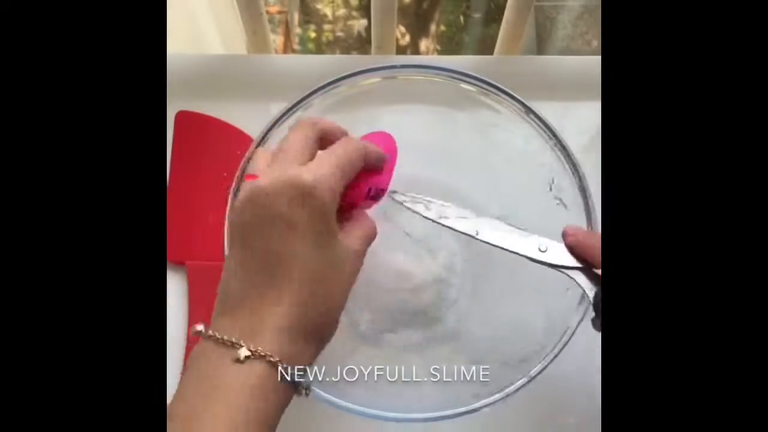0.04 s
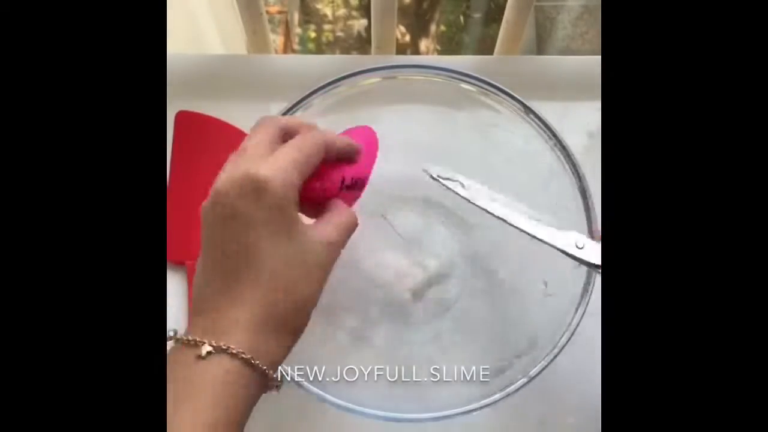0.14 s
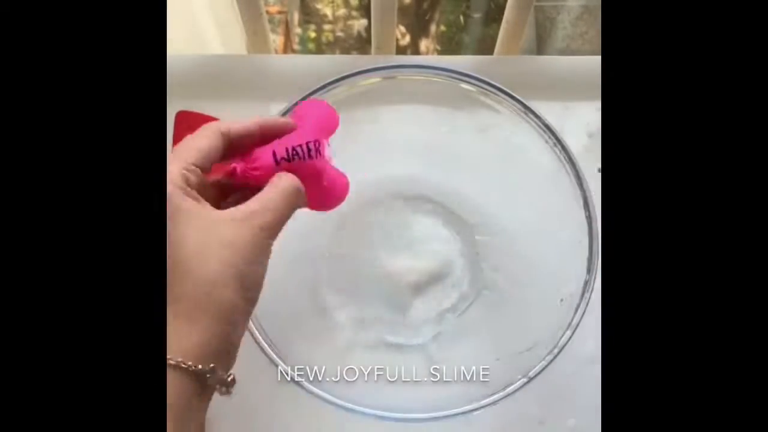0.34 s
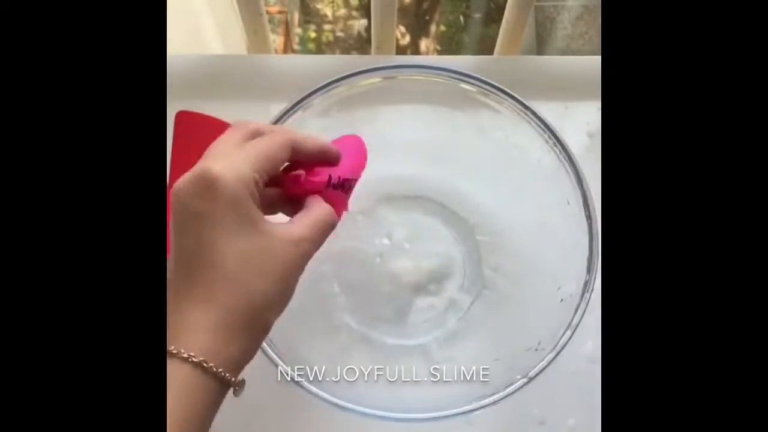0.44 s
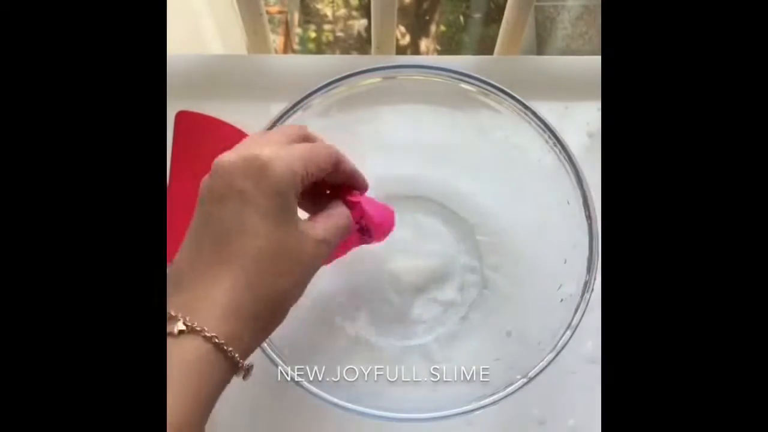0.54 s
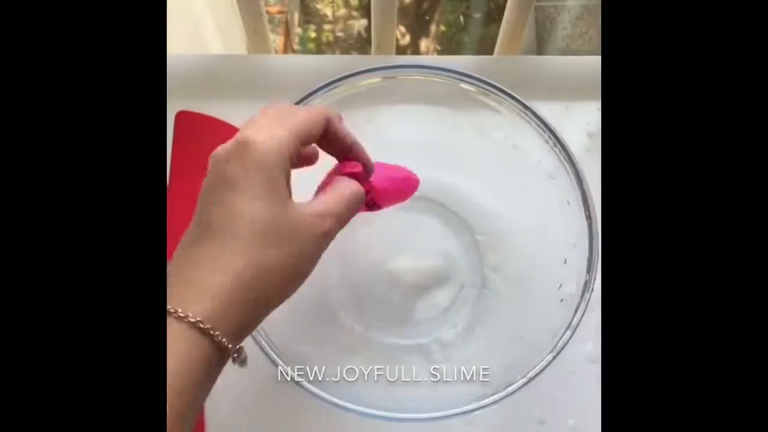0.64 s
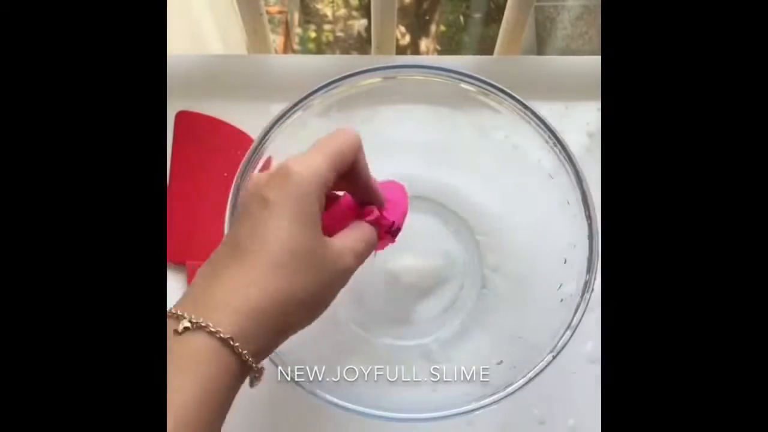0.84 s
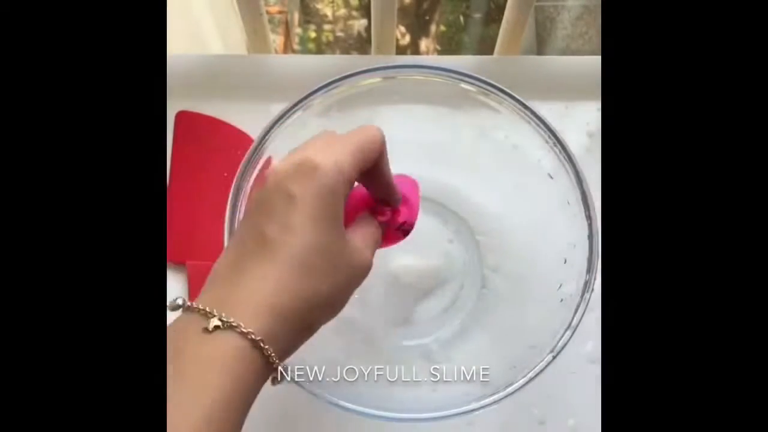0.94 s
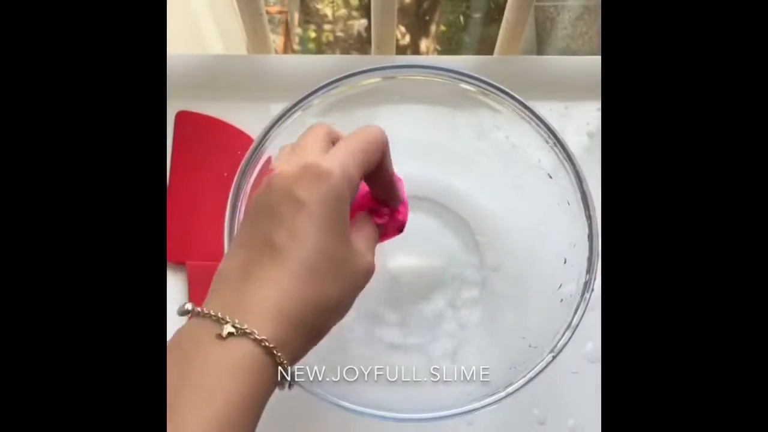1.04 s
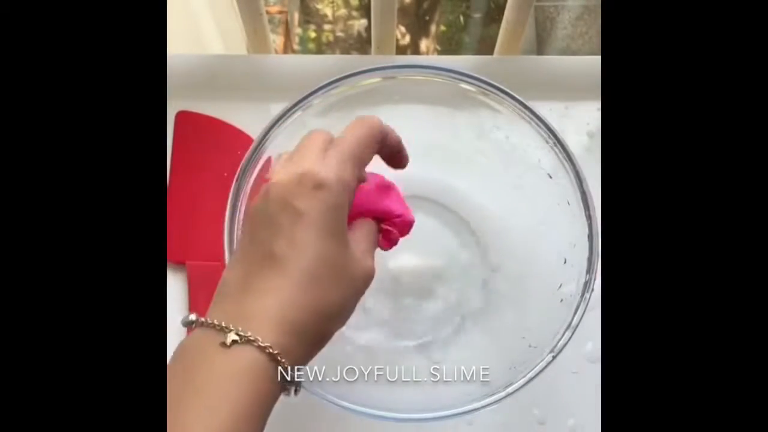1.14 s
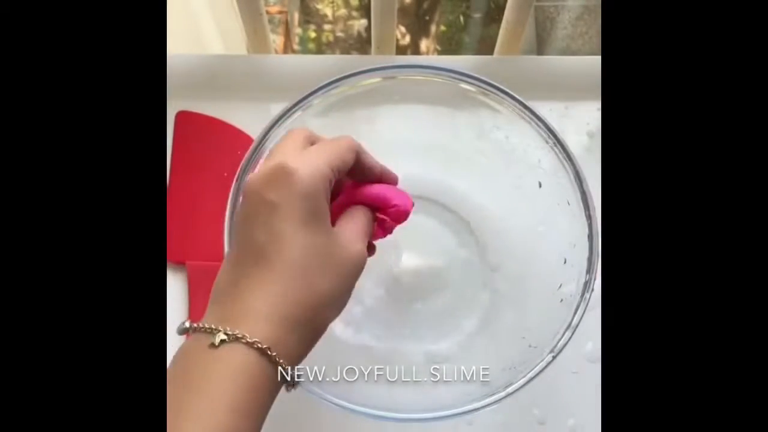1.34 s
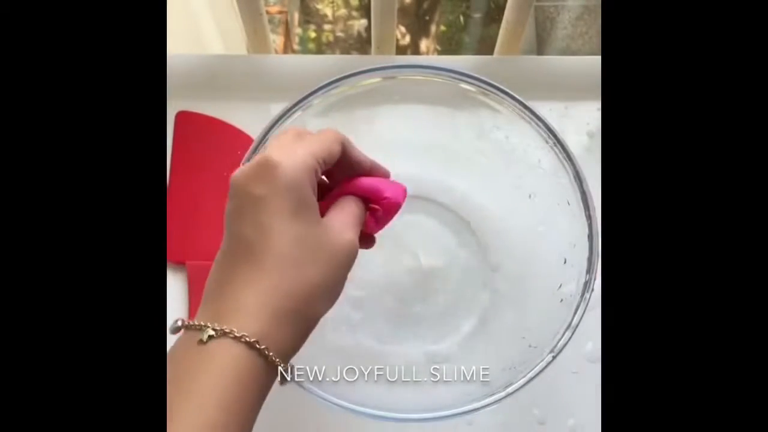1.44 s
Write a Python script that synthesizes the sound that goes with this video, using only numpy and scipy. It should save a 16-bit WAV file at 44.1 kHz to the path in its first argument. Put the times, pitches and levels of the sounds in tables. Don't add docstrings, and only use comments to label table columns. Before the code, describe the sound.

Scissors snip wet rubber: after a faint hum, a sharp squeal at 0.11 s opens into a hissing, singing water spurt until 0.2. At 0.24 a knock rings the glass bowl with throbbing notes. Wet snaps and chirping bubbles follow, strongest near 0.45. Soft rubbing and dull bumps come around 0.83-0.95, a knock with drops at 1.1, another with crisp crackles at 1.22, then tiny bubbles and snaps to 1.5. Close, short room echo.

```python
import sys
import numpy as np
from scipy import signal
from scipy.fft import rfft, irfft
from scipy.io import wavfile
from scipy.ndimage import uniform_filter1d

SR = 44100
rng = np.random.default_rng(int(sys.argv[2]) if len(sys.argv) > 2 else 0)


def put_to_file(sound):
    columns = np.atleast_2d(sound).T
    safe = np.clip(columns, -1, 1)
    whole_steps = np.round(safe * 32767)
    wavfile.write(sys.argv[1], SR, whole_steps.astype(np.int16))


def amplitude_ratio(level_db):
    exponent = np.asarray(level_db, float) / 20
    return 10 ** exponent


N = 66150


def read(points, hz):
    f, value = np.transpose(points)
    return np.interp(np.log(hz + 1), np.log(f + 1), value)


def evened(x):
    return x / np.sqrt(np.mean(x ** 2) + 1e-20)


def smoothed_twice(x, size, axis=-1):
    return uniform_filter1d(uniform_filter1d(x, size, axis=axis), size, axis=axis)


def add(mix, s, sound):
    part = mix[max(round(s * SR), 0):][:len(sound)]
    part += sound[:len(part)]


def resonate(x, hz, width_hz):
    turn = np.exp(2j * np.pi * np.cumsum(hz * np.ones(len(x))) / SR)
    r = np.exp(-np.pi * width_hz / SR)
    return 2 * (turn * signal.lfilter([1 - r], [1, -r], x / turn)).real


def resonate_twice(x, hz, width_hz):
    return resonate(resonate(x, hz, width_hz), hz, width_hz)


def coloured(x, tone):
    gain = amplitude_ratio(read(tone, np.fft.rfftfreq(len(x), 1 / SR)))
    return irfft(rfft(x) * gain, len(x))


def grainy(count, spread_db):
    z = signal.stft(rng.standard_normal(count + 128), nperseg=64, noverlap=48)[2].T
    drops = np.minimum(rng.exponential(1, z.shape), 6) ** 2 - 2
    drops = uniform_filter1d(uniform_filter1d(drops, size=4, axis=0), size=4, axis=1)
    z = z * amplitude_ratio(spread_db * evened(drops))
    return evened(signal.istft(z.T, nperseg=64, noverlap=48)[1][:count])


def level(times, levels_db, fall_s=0.014):
    t = np.arange(N) / SR
    outside = np.maximum(times[0] - t, 0) + np.maximum(t - times[-1], 0)
    return amplitude_ratio(np.interp(t, times, levels_db) - 20 * outside / fall_s)


# (frequency [Hz], level [dB per Hz])
AIR_TONE = [(75, -4), (300, -8.5), (450, -18), (850, -24.5), (1100, -29), (2500, -30.5), (3200, -36),
            (13000, -44.5)]


def air():
    noise = coloured(rng.standard_normal(N), AIR_TONE)
    above = np.fft.rfftfreq(N, 1 / SR) > 400
    reference = irfft(rfft(noise) * above, N)
    return noise / np.sqrt(np.mean(reference ** 2)) * amplitude_ratio(-57.5)


# (multiple of shaft speed [1], level [dB])
MOTOR_NOTES = [(3, -51.5), (4, -43), (7.3, -62.5), (9, -72), (11.9, -53.5), (15, -57)]


def motor():
    shaft_hz, waver_db = 24.24, 0.17
    t = np.arange(N) / SR
    hum = np.zeros(N)
    for order, db in MOTOR_NOTES:
        waver = evened(smoothed_twice(rng.standard_normal(N), 3000))
        note = np.sin(2 * np.pi * (order * shaft_hz * t + rng.random()))
        hum += amplitude_ratio(db + 1 + waver_db * order * waver) * note
    return hum


# (frequency [Hz], width [Hz], level [dB])
WHISTLES = [(861, 18, -66), (691, 31, -64.5), (1924, 12, -76), (1700, 99, -73.5)]


def whistles():
    return sum(amplitude_ratio(db) * evened(resonate(rng.standard_normal(N), hz, width_hz))
               for hz, width_hz, db in WHISTLES)


def patchy(x):
    hz, _, z = signal.stft(x, SR, nperseg=512)
    field = rng.standard_normal(z.T.shape)
    field = uniform_filter1d(uniform_filter1d(field, size=9, axis=0), size=14, axis=1)
    depth_db = 2.1 * np.minimum(hz / 2000, 1)[:, None]
    return signal.istft(z * amplitude_ratio(depth_db * evened(field).T), SR, nperseg=512)[1][:N]


def echo(x):
    level_db, t60_s = -18, 0.22
    t = np.arange(20000) / SR
    tail = rng.standard_normal(20000) * amplitude_ratio(-60 * t / t60_s) * np.minimum(t / 0.014, 1)
    return signal.oaconvolve(x, amplitude_ratio(level_db) * tail / np.linalg.norm(tail))[:N]


# (start [s], length
# [s], level [dB], centre [Hz], width [Hz])
RUBS = [(0.825, 0.12, -43.5, 221, 300), (0.059, 0.17, -56, 9600, 9100), (0.258, 0.27, -52.5, 4460, 8840),
        (0.206, 0.13, -48.5, 12100, 7000), (0.318, 0.071, -58, 6000, 5300), (0.385, 0.17, -67, 7100, 1492),
        (0.451, 0.058, -41.5, 3270, 1700), (0.175, 0.042, -42.5, 4730, 200),
        (0.447, 0.085, -45, 9400, 6440), (0.512, 0.047, -50, 2800, 1480), (0.706, 0.095, -53.5, 3020, 1260),
        (0.712, 0.072, -57.5, 8560, 8150), (0.883, 0.064, -51.5, 6500, 4360),
        (0.884, 0.21, -60.5, 10300, 8150), (1.225, 0.26, -55.5, 12100, 4000),
        (1.367, 0.051, -45, 4900, 7000), (1.452, 0.075, -51, 12800, 3960)]


def rub(s, length, db, hz, width_hz):
    u = np.linspace(0, 1, round(length * SR))
    peak = 0.2
    shape = np.sin(np.pi * u ** (np.log(0.5) / np.log(peak))) ** 1.37
    friction = evened(resonate_twice(grainy(12000, 3.5), hz, width_hz))
    return s, amplitude_ratio(db) * shape * friction[:len(u)]


# (time [s], level [dB], centre [Hz], time to fall 60 dB [s])
KNOCKS = [(.118, -29.5, 1900, 0.042), (0.131, -29.5, 210, 0.25), (0.24, -29.5, 1800, 0.026),
          (.243, -29, 257, 0.052), (0.2466, -31.5, 706, 0.078), (0.432, -37.5, 900, 0.031),
          (0.828, -48.5, 1240, 0.17), (.912, -42.5, 504, 0.08), (1.106, -56, 2000, 0.051),
          (1.108, -33.5, 980, 0.11), (1.108, -31, 252, 0.076), (1.2203, -42, 1570, 0.12),
          (1.223, -36.5, 316, 0.048)]


def knock(s, db, hz, t60):
    t = np.arange(12000) / SR
    push = rng.standard_normal(12000) * amplitude_ratio(-60 * t / t60) + 3.2 * (t == 0)
    blow = resonate_twice(push, hz, 1.24 * hz)
    return s, amplitude_ratio(db) * blow / abs(blow).max()


# (time [s], frequency [Hz], level [dB], time to fall 60 dB [s], shift of each partner [Hz])
RINGS = [(0.144, 1070, -48, 0.37, 4.6), (.24, 858, -34.5, 0.25, 6.4), (0.239, 1050, -37.5, 0.35, 6.3),
         (.24, 718, -33.5, 0.18, 21.8), (0.24, 2442, -35, 0.41, 4.75), (0.241, 4344, -36, 0.24, 6.8),
         (0.369, 1048, -51, 0.62, 4), (0.499, 4380, -48.5, 0.3, 6.9), (1.108, 861, -38.5, 0.22, 8.6)]


def ring(s, hz, db, t60, beat_hz):
    t = np.arange(24000) / SR
    lower = np.sin(2 * np.pi * (hz - beat_hz) * t)
    upper = 0.94 * np.sin(2 * np.pi * (hz + beat_hz) * t)
    return s, amplitude_ratio(db - 5.5 - 60 * t / t60) * (lower - upper) * np.minimum(t / 0.008, 1)


# (frequency [Hz], level [dB], time to fall 60 dB [s])
FLOOR_MODES = [(750, -3.5, 0.036), (1235, -2, 0.027), (2100, -9, 0.025), (2300, -11.5, 0.044),
               (3090, -15, .02), (4000, -13, 0.017), (4430, -20, 0.028)]
# (time [s], level [dB], tilt [dB per octave])
TAPS = [(1.1045, -32.5, 2.5), (1.1063, -47, -2.5), (1.1112, -41.5, 1), (1.1165, -42, 2.5),
        (1.2205, -39.5, 2), (1.2225, -39.5, -8), (1.227, -39.5, 0), (1.232, -46.5, 3)]


def tap(s, db, tilt_db):
    t = np.arange(3000) / SR
    sound = np.zeros(3000)
    for hz, mode_db, t60 in FLOOR_MODES:
        start_db = db + mode_db + tilt_db * np.log2(hz / 1000)
        sound += amplitude_ratio(start_db - 60 * t / t60) * np.sin(2 * np.pi * hz * t)
    return s, sound


# (time [s], level [dB], centre [Hz], width [Hz], time to fall 60 dB [s])
SNAPS = [(0.23, -30, 9600, 5000, 0.027), (0.258, -29, 8200, 6050, 0.017), (0.315, -39, 9300, 4000, .02),
         (0.328, -35, 9400, 6000, 0.044), (0.432, -37.5, 7140, 4030, .01), (0.4517, -28, 3420, 2600, 0.017),
         (.483, -26.5, 10740, 2970, 0.014), (0.5197, -32, 3120, 2540, 0.0049),
         (0.768, -54, 3220, 1500, 0.0087), (1.023, -43, 2960, 1800, 0.016),
         (1.106, -37.5, 6000, 8900, 0.016), (1.221, -44.5, 4040, 1490, 0.016),
         (1.229, -29, 12500, 2480, 0.016), (1.241, -20.5, 13500, 2480, 0.0078),
         (1.246, -30.5, 11000, 5040, 0.0073), (1.251, -27.5, 12440, 3000, 0.026),
         (1.297, -49, 12100, 3000, 0.0067), (1.326, -46, 12360, 2500, 0.033),
         (1.455, -56, 11000, 3020, .015), (1.462, -50, 11000, 2500, 0.013),
         (1.475, -37.5, 11700, 2030, 0.0097), (1.491, -39, 11700, 2000, 0.01)]


def snap(s, db, hz, width_hz, t60):
    t = np.arange(4000) / SR
    fall = amplitude_ratio(-60 * t / t60) + amplitude_ratio(-1.5 - 27.0 * t / t60)
    push = rng.standard_normal(4000) * fall + 4.5 * (t == 0)
    puff = resonate_twice(push, hz, width_hz)
    return s, amplitude_ratio(db) * puff / abs(puff).max()


# (peak time [s], frequency [Hz], level [dB], rise [s], time to fall 60 dB [s])
DROPLETS = [(0.12, 2800, -22.5, 0.001, 0.009), (.126, 2500, -31, 0.00065, .014),
            (0.13, 2600, -24, 0.00065, .014), (0.1451, 2300, -22, 0.00096, 0.017),
            (0.17, 2800, -27, 0.0016, 0.011), (.163, 2250, -24, 0.0012, .012),
            (0.17, 2600, -18, 0.00089, 0.024), (.1745, 2500, -22, 0.002, .018),
            (.169, 5000, -24.5, 0.0013, 0.014), (.2415, 514, -25.5, 0.000944, 0.0086),
            (.249, 794, -29.5, 0.002685, 0.028), (.2505, 1055, -31.5, 0.0017, 0.057),
            (.262, 1850, -49, .004, 0.037), (.4405, 1800, -38.5, .001, 0.0082),
            (.4565, 3600, -34, 0.00055, 0.011), (.46, 3950, -33, .001, .012),
            (.4635, 3170, -31.5, 0.0014, 0.019), (.468, 3450, -30.5, 0.00094, 0.015),
            (0.46, 3600, -37, 0.00091, 0.011), (0.45, 2800, -47, 0.0012, .012),
            (1.369, 4000, -45, .0008, .015), (1.376, 3840, -32.5, 0.00095, 0.0079),
            (1.38, 4300, -39, 0.00094, .01), (1.382, 1700, -46, .0008, .01),
            (1.3812, 7400, -47, 0.00032, 0.0061), (1.238, 4000, -51, 0.0018, .02),
            (.4521, 4150, -26.5, 0.000302, 0.0041), (.2408, 1880, -33.5, 0.000488, .01),
            (.1205, 1620, -26.5, 0.00098, 0.029), (.125, 800, -35.5, 0.0028, 0.034),
            (.853, 570, -48.5, .008, 0.076), (.863, 360, -37.5, 0.0091, 0.061),
            (0.96, 187, -37.5, 0.00502, 0.035), (.33, 290, -40, 0.01001, .07),
            (.275, 180, -39.5, .008, 0.067), (1.1, 4040, -42.5, .0006, 0.014)]
# (peak time [s], frequency [Hz],
# level [dB], rise [s], time to fall 60 dB [s])
SQUEALS = [(0.1092, 3760, -25, 0.0007, 0.02), (.1146, 3880, -11, .0036, .014),
           (.186, 2585, -28, 0.0017, 0.016), (.259, 6440, -43, 0.0012, 0.013),
           (0.335, 6440, -40.5, 0.00062, 0.023), (.1188, 2680, -9, .0013, .02),
           (.1203, 3070, -16.5, .001, .022), (0.167, 127, -31.5, .008, 0.055),
           (0.248, 127, -28, 0.00547, 0.036), (0.294, 113.5, -35.5, 0.0118, 0.12),
           (0.119, 6940, -18.5, .0015, 0.038), (.12, 12060, -17.5, 0.00093, .012),
           (0.1652, 2519, -14.5, 0.0018, 0.058), (0.393, 1750, -43.5, 0.0013, 0.022),
           (0.4338, 1822, -30.5, 0.001, 0.028), (.471, 6100, -33, 0.00067, 0.017),
           (0.767, 8360, -47.5, .001, 0.024), (1.007, 3430, -51, 0.00081, .02),
           (1.281, 7660, -48, 0.0011, .012), (1.327, 7930, -41, 0.00087, 0.016),
           (1.3733, 3730, -27.5, 0.001, 0.0075), (1.382, 3390, -38, 0.0015, .01)]


def ping(s, hz, db, rise, t60):
    t = np.arange(-3 * rise, t60, 1 / SR)[:12000]
    wobble = uniform_filter1d(rng.standard_normal(12000), 40)
    wobble = evened(wobble - uniform_filter1d(wobble, size=300))[:len(t)]
    phase = 2 * np.pi * np.cumsum(hz * (1 + 0.0094 * wobble)) / SR
    shape = np.where(t < 0, np.exp(-(t / rise) ** 2), amplitude_ratio(-60 * t / t60))
    return s - 3 * rise, amplitude_ratio(db) * shape * np.sin(phase)


# (time [s], level [dB], frequency [Hz])
POCKET = [(.117, -30, 2680), (.122, -33, 2600), (.132, -22, 2630), (.157, -25, 2640), (.168, -13, 2640),
          (.18, -26, 2620), (.196, -33.5, 2700), (.235, -42, 2620)]


def pocket():
    times, levels_db, pitches = np.transpose(POCKET)
    hz = np.interp(np.arange(N) / SR, times, pitches)
    song = resonate(resonate(grainy(N, 1.5), hz, 398.0), hz, 550.0)
    return evened(song) * level(times, levels_db, fall_s=0.0064) * amplitude_ratio(-12.5)


# (time [s], level [dB])
SPRAY = [(.1068, -48), (.108, -33.5), (.115, -30), (.119, -17.5), (.13, -25.5), (.158, -27), (.168, -26.5),
         (.195, -49.5), (.235, -50)]
# (frequency [Hz], level [dB per Hz])
SPRAY_TONE = [(500, -46), (1500, -18.5), (2100, -7), (2700, -0.5), (4500, -4.5), (6000, -9), (9000, -8.5),
              (13500, -9.5)]


def spray():
    hiss = evened(coloured(grainy(N, 3.2), SPRAY_TONE))
    return hiss * level(*np.transpose(SPRAY)) * amplitude_ratio(3.0)


def scene():
    background = patchy(air() + motor() + whistles())
    near = spray() + pocket()
    sources = ((rub, RUBS), (knock, KNOCKS), (ring, RINGS), (tap, TAPS), (snap, SNAPS),
               (ping, DROPLETS), (ping, SQUEALS))
    for make, events in sources:
        for event in events:
            add(near, *make(*event))
    return (near + echo(near) + background)[None]


def top_cut(x):
    return signal.sosfilt(signal.butter(12, 14910, fs=SR, output="sos"), x)


def record(dry):
    low_cut = signal.butter(6, 70, "high", fs=SR, output="sos")
    cut = signal.sosfilt(low_cut, dry)
    band_limit = signal.firwin(255, 13950, window=("kaiser", 8), fs=SR)
    mix = signal.oaconvolve(cut, band_limit[None], "same")
    return top_cut(mix)


dry = scene()
out = record(dry)
put_to_file(out)
```